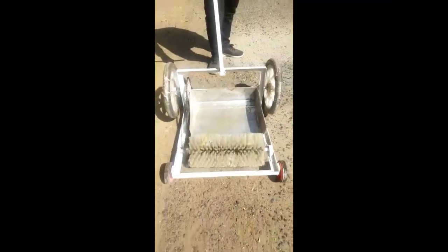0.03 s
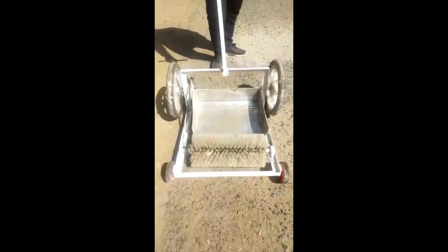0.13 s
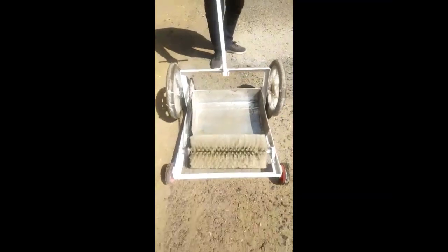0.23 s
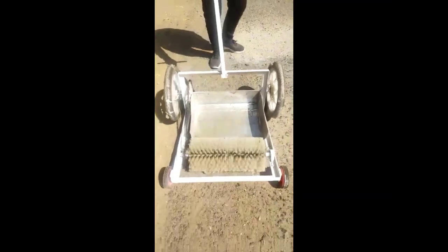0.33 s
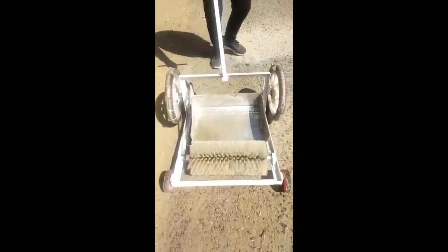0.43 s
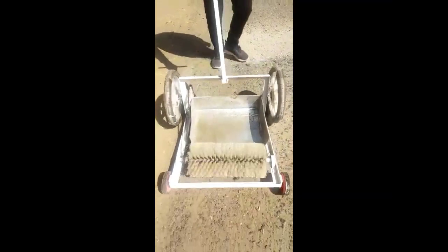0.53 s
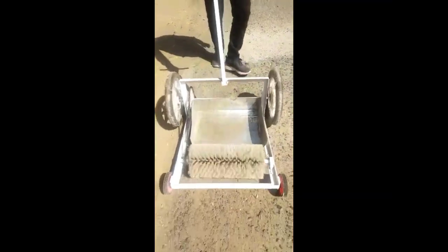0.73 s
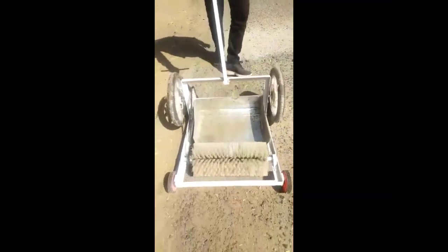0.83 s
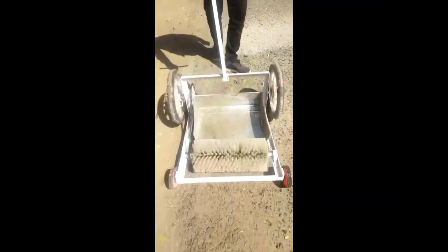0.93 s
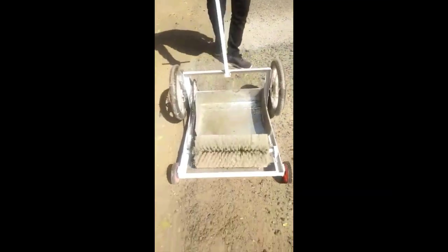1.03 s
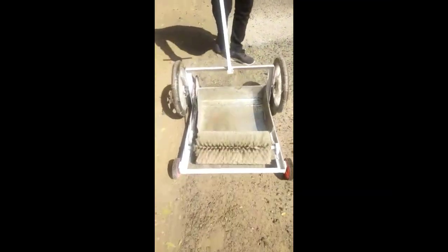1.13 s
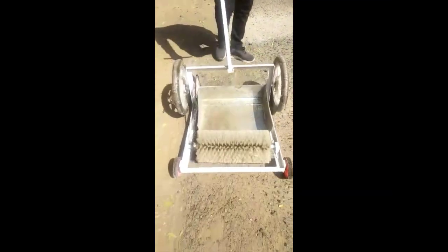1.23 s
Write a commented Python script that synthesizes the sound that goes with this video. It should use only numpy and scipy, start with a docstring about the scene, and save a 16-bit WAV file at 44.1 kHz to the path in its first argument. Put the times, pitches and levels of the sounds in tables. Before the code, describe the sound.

A push sweeper rolls over sandy ground, close and slightly right, in quiet open air. At about 0.2 seconds its metal pan clanks and the brush starts scratching, flicking sprays of grit into the pan. The wheels shake it into a hollow rattle, loudest from 0.5 to 0.75 seconds, with soft thuds. From 0.9 seconds it slows, leaving weaker scratches and a few dull, crunchy bumps until about 1.3 seconds.

```python
"""Outdoors on sandy ground, a stereo pair with a push sweeper close by and slightly to the right.
Shoved once, the sweeper slows almost to a stop. Its turning brush scratches the grit and flicks sprays
of it into a sheet-metal pan, which clanks as the push begins. The wheels shake the frame into a hollow
rattle, and a few soft thuds come through the ground. Quiet open air lies behind it all."""
import sys
import numpy as np
from scipy import signal
from scipy.fft import rfft, irfft, next_fast_len
from scipy.io import wavfile
from scipy.ndimage import map_coordinates

SR = 44100
rng = np.random.default_rng(int(sys.argv[2]) if len(sys.argv) > 2 else 0)


def waveform_to_disk(signal):
    """Save audio, clipped to [-1, 1], as 16-bit WAV at the path in sys.argv[1]."""
    frames = np.transpose(np.atleast_2d(signal))
    scaled = np.clip(frames, -1, 1) * 32767
    samples = np.round(scaled).astype(np.int16)
    wavfile.write(sys.argv[1], SR, samples)


N = 57330
GRAINS_PER_S, PEBBLES_PER_S, JOLTS_PER_S = 9000, 2500, 900

# Modes of the sheet-metal pan. Each row: frequency in Hz, width in Hz, level in dB.
PAN_MODES = [(690, 19, -8.5), (915, 27, -4), (1012, 28, 4), (1090, 13, -13), (1600, 40, -11),
             (1955, 23, 1.5), (2076, 27, -3), (2395, 117, -5.5), (2680, 26, -5), (2910, 24, -2),
             (3570, 20, -36)]
# How alike the two microphones sound. Each row: frequency in Hz, correlation from 0 to 1.
MIC_LIKENESS = [(40, .75), (80, .88), (150, .98), (600, .95), (1200, .8), (2200, .66), (3500, .35),
                (14000, .1)]


def brush():
    """Bristles scratch sand and throw it in sprays; the coarser grains ring the pan."""
    # The brush on the ground. Each row: time in seconds, scratching in dB, pan ring in dB.
    brush_levels = [(0.12, -70.5, -72), (0.224, -29, -30.5), (0.274, -32, -22.5), (0.358, -29, -22),
                    (0.402, -24.5, -23.5), (0.48, -20, -16), (0.598, -22, -32), (0.644, -27.5, -20.5),
                    (0.78, -26.5, -20.5), (0.97, -36.5, -53.5), (1.096, -32.5, -82), (1.236, -52.5, -52.5),
                    (1.3, -31.5, -33)]
    # Grit hitting the pan. Each row: start in seconds, level in dB, pan ring relative to it in dB,
    # attack and the spray's T60 in seconds.
    sprays = [(0.057, -42, -9.5, 0.0028, 0.12), (0.085, -73, 0, .002, 0.1), (.157, -43.5, -1, 0.0032, .15),
              (.184, -29.5, -12.5, .012, .3), (0.2299, -8.5, -7.5, 0.0038, 0.14),
              (.351, -15, -9, 0.0043, 0.17), (0.425, -15.5, -4, 0.0035, 0.2),
              (0.466, -9, -10.5, .005, 0.077), (0.531, -6.5, -4, 0.0076, 0.1), (0.56, -2, -30, 0.012, 0.12),
              (.609, -11.5, -4, 0.0044, 0.33), (0.755, -13, -20, 0.004, 0.21),
              (.897, -22.5, -4, 0.0015, 0.12), (0.951, -27, -25, 0.0013, 0.38),
              (.999, -22.5, -13, 0.00057, 0.073), (1.0312, -20, -17, 0.0012, 0.19),
              (1.121, -21.5, -20.5, 0.00081, 0.05)]
    # Spectra of the sand and of the pan between its modes. Each row: frequency in Hz, level in dB.
    sand_spectrum = [(200, -34), (500, -28), (750, -16.5), (1400, -13), (2800, -2.5), (3700, -2.5),
                     (4800, -1), (6000, -3.5), (7000, 5.5), (8300, -1), (9900, -2), (11000, -5),
                     (13200, -5.5), (14900, 0.5), (16000, -21)]
    pan_spectrum = [(200, -54), (550, -23), (850, -4), (1300, -7), (2400, -6.5), (4000, -9.5), (8000, -22)]
    scratch_db, ring_db, pan_t60_s = 4, 0.5, 0.3
    scratch, ring = gains(brush_levels)
    spray = bursts([(s, db, attack, t60) for s, db, _, attack, t60 in sprays])
    patter = bursts([(s, db + pan_db, attack, pan_t60_s) for s, db, pan_db, attack, _ in sprays])
    clumps = amp(0.74 * wobble(300) + 0.7 * wobble(47.6))
    sand = shimmer(at_mics(impacts(GRAINS_PER_S, scatter_db=2), sand_spectrum))
    pan = at_mics(impacts(PEBBLES_PER_S, scatter_db=1.5), pan_spectrum, PAN_MODES, low_hz=630)
    sand_level = np.hypot(amp(scratch_db) * scratch, spray)
    pan_level = np.hypot(amp(ring_db) * ring, patter)
    return clumps * (sand_level * sand + pan_level * pan)


def shimmer(grains, share=0.79, t60_s=0.092):
    """Each grain also sets off a short ring of the metal's countless high modes."""
    t = np.arange(SR // 8) / SR
    tail = rng.standard_normal((2, len(t))) * amp(-60 * t / t60_s)
    rung = signal.fftconvolve(grains, tail / np.linalg.norm(tail[0]), axes=1)[:, :N]
    return np.sqrt(1 - share ** 2) * grains + share * rung


def wheels(gain_db=-2.5):
    """Irregular jolts from the rough ground rattle the frame and hopper."""
    # Strength of the shaking. Each row: time in seconds, level in dB.
    roll_levels = [(0.3, -77), (0.318, -44.5), (0.406, -29), (0.45, -21.5), (0.514, -16.5), (0.534, -6),
                   (0.556, -13), (0.582, -10), (0.608, -12), (0.634, -5), (0.732, -13.5), (0.788, -26.5),
                   (0.81, -28), (0.882, -44), (0.918, -34), (0.95, -45), (1.016, -45), (1.056, -26),
                   (1.23, -61.5)]
    # Modes of the frame and hopper. Each row: frequency in Hz, width in Hz, level in dB.
    frame_modes = [(165, 66, -2.5), (234.8, 31, 0.5), (377, 8, -4), (409, 29, 1.5), (485, 43, -0.5),
                   (541.6, 24, -0.5), (677, 24, 11), (736, 30, 6), (881.5, 23, 6), (918, 15, -1.5),
                   (1073, 20, -1.5), (1230, 33, -35)]
    # The rattle between those modes. Each row: frequency in Hz, level in dB.
    frame_spectrum = [(25, -42), (70, -24), (150, -30), (290, -4), (450, -4), (900, -6.5), (1500, -34),
                      (4000, -37)]
    roll, = gains(roll_levels)
    jolts = impacts(JOLTS_PER_S, scatter_db=2)
    return amp(gain_db) * roll * at_mics(jolts, frame_spectrum, frame_modes, low_hz=66.5)


def clanks(attack_s=0.001, t60_s=0.59, waver_rad=0.21):
    """A hard knock sets all the pan's modes ringing together."""
    # Knocks on the pan. Each row: start in seconds, level in dB.
    knocks = [(0.2323, -19), (0.894, -42)]
    t = np.arange(N) / SR
    ring = np.zeros((2, N))
    for hz, _, db in PAN_MODES:
        mic_phase = mic_angle(hz) * np.array([[1], [-1]]) * wobble(30.4)
        phase = 2 * np.pi * (hz * t + rng.random()) + waver_rad * wobble(62.6)
        ring += amp(db) * np.sin(phase + mic_phase)
    return bursts([(s, db, attack_s, t60_s) for s, db in knocks]) * unit(ring)


def thuds(attack_s=0.0092, t60_s=0.14, crunch_attack_s=0.0028, crunch_t60_s=0.23):
    """Dull bumps of wheels and feet on the ground, each crushing some grit."""
    # Each row: start in seconds, level of the bump in dB, crunch relative to it in dB.
    bumps = [(.203, -39, -30), (.4, -27, -23), (0.439, -19, -4), (.532, -34, -17), (0.619, -20, -6),
             (.91, -60, 22), (0.992, -29, -1.5), (1.034, -21.5, -1), (1.072, -27.5, -14)]
    # Spectra of the bump and of the crushed grit. Each row: frequency in Hz, level in dB.
    thud_spectrum = [(25, -42), (55, -36), (85, -10), (120, -11), (153, -5.5), (210, -17.5), (400, -28),
                     (1500, -60)]
    crunch_spectrum = [(100, -37), (350, -21), (800, -12), (1500, -40), (2400, -5), (4000, -30),
                       (9000, -49)]
    # Hollow resonances of the crunch. Each row: frequency in Hz, width in Hz, level in dB.
    crunch_modes = [(720, 84, 0), (755, 85, -5), (2270, 240, 5), (2740, 240, 3)]
    thud_level = bursts([(s, db, attack_s, t60_s) for s, db, _ in bumps])
    crunch_level = bursts([(s, db + rel_db, crunch_attack_s, crunch_t60_s) for s, db, rel_db in bumps])
    thud = at_mics(rng.standard_normal((2, N)), thud_spectrum)
    crunch = at_mics(impacts(PEBBLES_PER_S, scatter_db=-3), crunch_spectrum, crunch_modes)
    return thud_level * thud + crunch_level * crunch


def air(level_db=-50.5):
    """Quiet outdoor air: a steady low rush with a faint hiss."""
    # Each row: frequency in Hz, level in dB.
    air_spectrum = [(25, -19), (60, 0.5), (100, 3.5), (150, 5), (280, -9), (420, -2), (900, -2.5),
                    (1300, -3), (2500, -7.5), (5000, -14), (7300, -12), (11000, -21), (15000, -18)]
    return amp(level_db) * at_mics(rng.standard_normal((2, N)), air_spectrum)


def amp(db):
    """Decibels to gain."""
    return 10 ** (np.asarray(db) / 20)


def unit(x):
    """Scale to rms 1."""
    return x / np.sqrt(np.mean(x ** 2) + 1e-20)


def along(points, hz):
    """Interpolate (Hz, value) points on a log frequency axis."""
    freqs, values = np.transpose(points)
    return np.interp(np.log(hz + 1), np.log(freqs + 1), values)


def gains(rows):
    """One gain curve for each dB column after the time; silent before the first row."""
    times, *columns = np.transpose(rows)
    t = np.arange(N) / SR
    return [amp(np.interp(t, times, db)) * (t >= times[0]) for db in columns]


def bursts(rows):
    """Envelope of bursts that swell quickly and die away, summed in power."""
    power = np.zeros(N)
    for start_s, db, attack_s, t60_s in rows:
        t = np.maximum(np.arange(N) / SR - start_s, 0)
        power += (amp(db - 60 * t / t60_s) * (1 - np.exp(-t / attack_s))) ** 2
    return np.sqrt(power)


def wobble(knots_per_s):
    """A smooth random curve."""
    return map_coordinates(rng.standard_normal(2000), [np.arange(N) * knots_per_s / SR], mode="wrap")


def impacts(per_s, scatter_db):
    """Two unrelated streams of tiny random blows of scattered size."""
    hit = rng.random((2, N)) < per_s / SR
    polarity = np.sign(rng.standard_normal((2, N)))
    return hit * polarity * amp(scatter_db * np.clip(rng.standard_normal((2, N)), -2, 2))


def filtered(x, response):
    """Filter x by a complex response, given as a function of Hz."""
    size = next_fast_len(N + SR // 2)
    return irfft(rfft(x, size) * response(np.fft.rfftfreq(size, 1 / SR)), size)[..., :N]


def resonances(modes, hz):
    """Summed response of damped modes."""
    return sum(amp(db) * 1j * hz * width / (centre ** 2 - hz ** 2 + 1j * hz * width)
               for centre, width, db in modes)


def mic_angle(hz):
    """Mid-side angle in radians: zero where both microphones hear the same."""
    return np.arccos(np.clip(along(MIC_LIKENESS, hz), -1, 1)) / 2


def at_mics(pair, spectrum, modes=(), low_hz=10):
    """Colour two streams and spread them over both microphones, with the mid signal at rms 1."""
    def response(hz):
        angle = mic_angle(hz)
        radiated = hz ** 4 / np.hypot(hz ** 4, low_hz ** 4)  # little radiates below low_hz
        colour = amp(along(spectrum, hz)) + resonances(modes, hz)
        return radiated * colour * np.array([np.cos(angle), np.sin(angle)])
    mid, side = filtered(pair, response)
    return np.array([mid + side, mid - side]) / np.std(mid)


def scene():
    """The sweeper, slightly right of the microphones, over quiet outdoor air."""
    # Each row: frequency in Hz, level of the right microphone over the left in dB.
    right_louder = [(100, -0.5), (400, 0.9), (1400, 2.4), (4000, -0.15), (11000, -0.6), (14500, -3.5)]
    # Each row: frequency in Hz, lag of the left microphone behind the right in radians.
    left_lag = [(60, .03), (300, 0.49), (480, 0.34), (700, 0.97), (1000, 0.76), (2300, 0.44), (3200, 2.13),
                (7000, 3.3)]
    sides = np.array([[-.5], [.5]])

    def placement(hz):
        return amp(sides * along(right_louder, hz)) * np.exp(1j * sides * along(left_lag, hz))
    sweeper = brush() + wheels() + thuds() + clanks()
    return filtered(sweeper, placement) + air()


def record(dry):
    """The recorder rounds the highest peaks and keeps nothing above its band limit."""
    ceiling, top_hz = 1.04, 15720
    rounded = dry / (1 + np.abs(dry / ceiling) ** 8) ** (1 / 8)
    return filtered(rounded, lambda hz: hz < top_hz)


dry = scene()
out = record(dry)
waveform_to_disk(out)
```